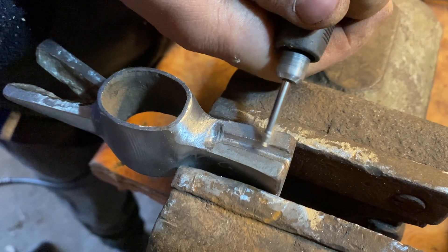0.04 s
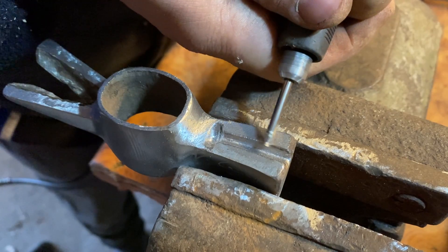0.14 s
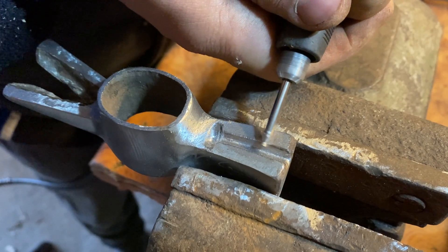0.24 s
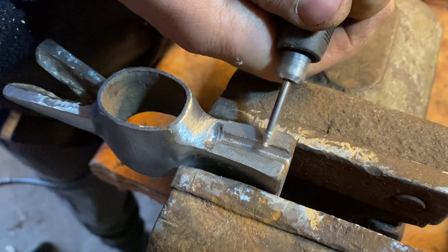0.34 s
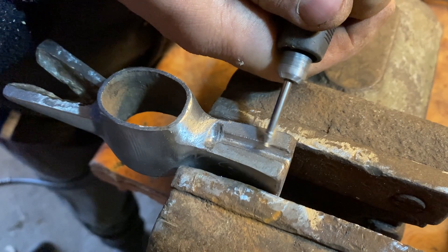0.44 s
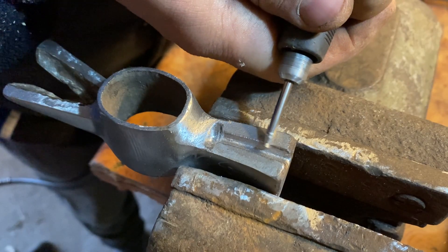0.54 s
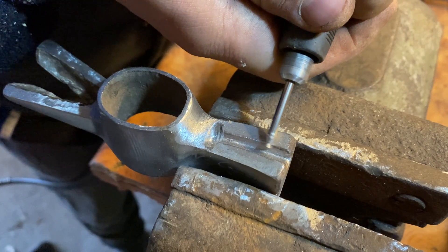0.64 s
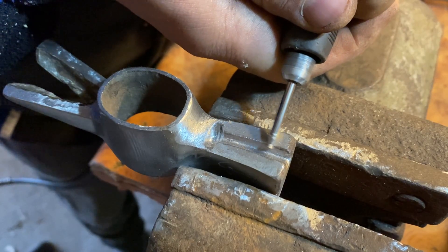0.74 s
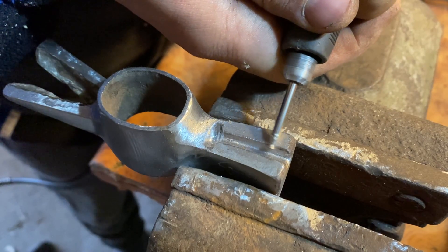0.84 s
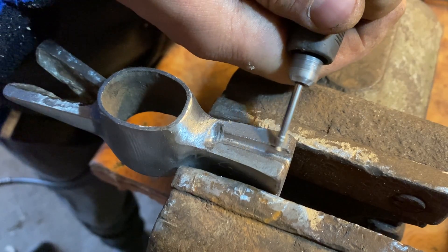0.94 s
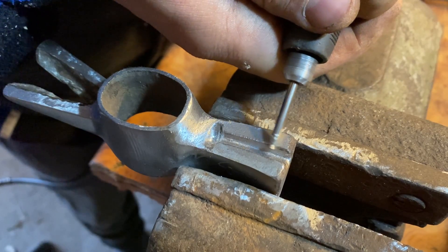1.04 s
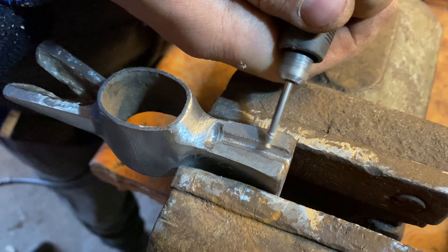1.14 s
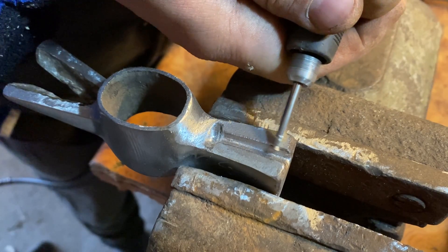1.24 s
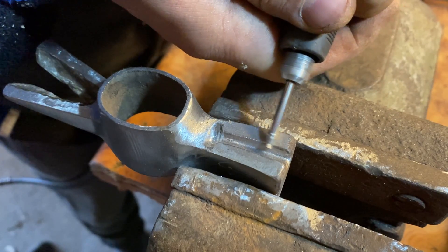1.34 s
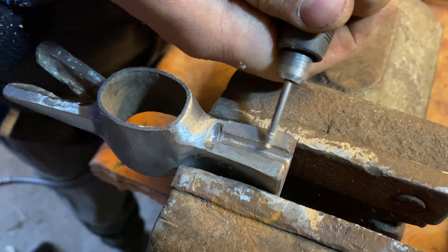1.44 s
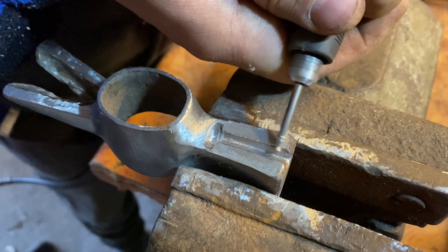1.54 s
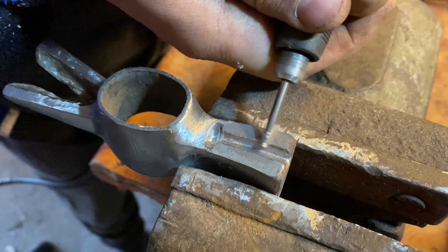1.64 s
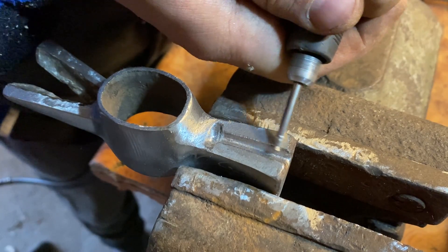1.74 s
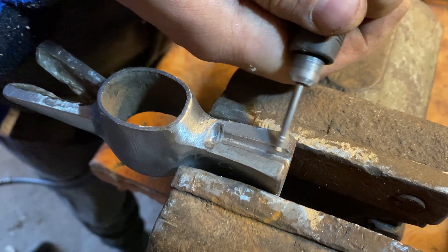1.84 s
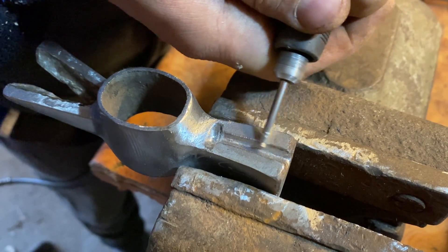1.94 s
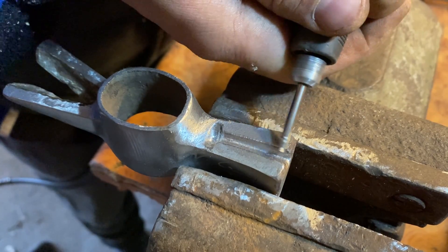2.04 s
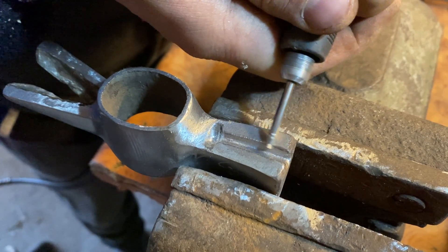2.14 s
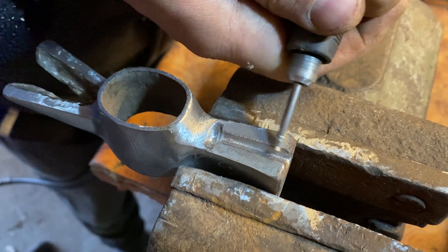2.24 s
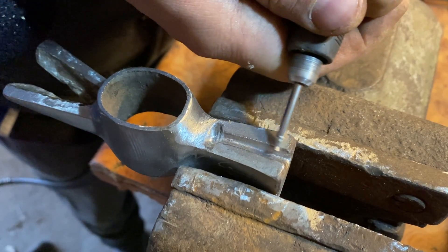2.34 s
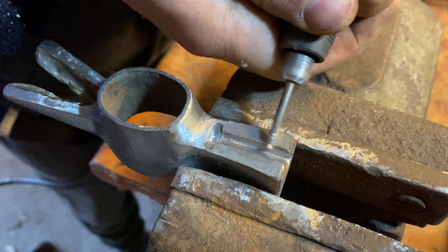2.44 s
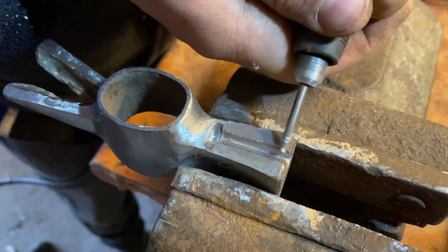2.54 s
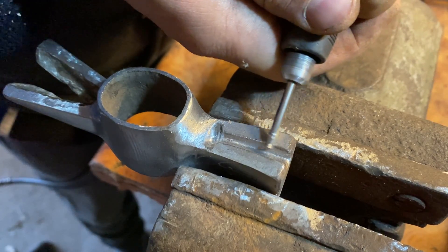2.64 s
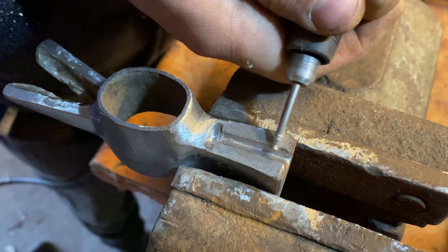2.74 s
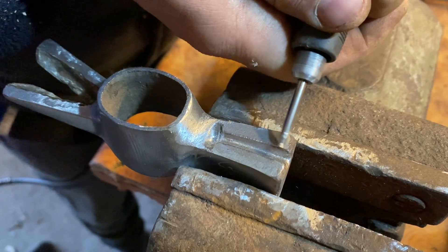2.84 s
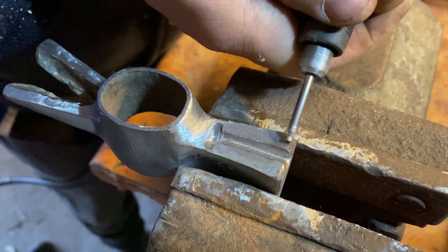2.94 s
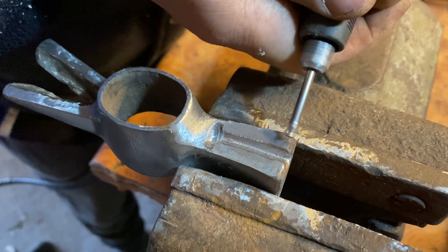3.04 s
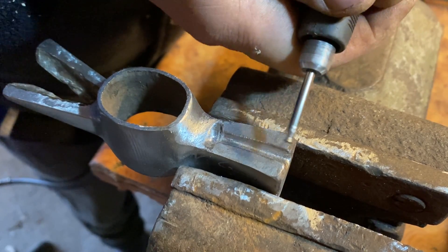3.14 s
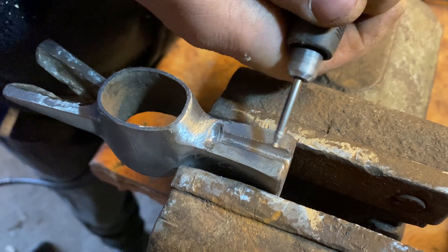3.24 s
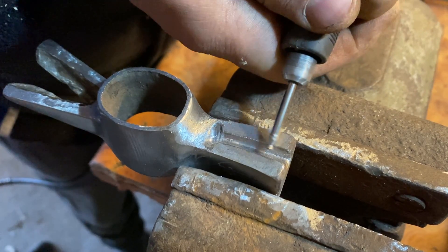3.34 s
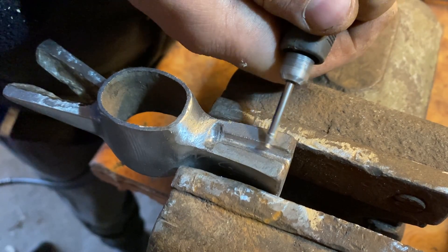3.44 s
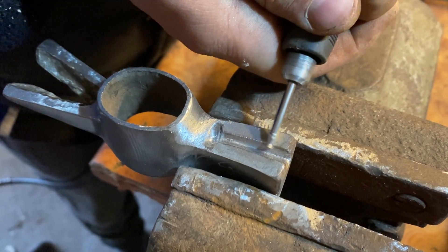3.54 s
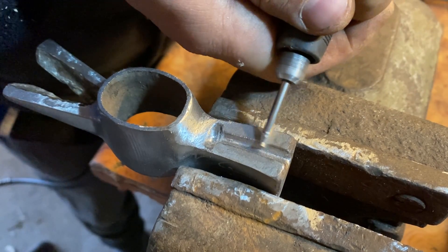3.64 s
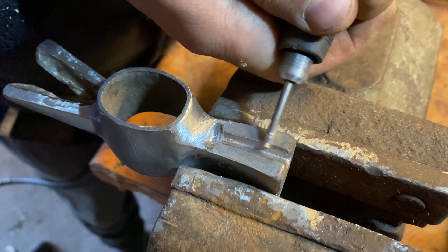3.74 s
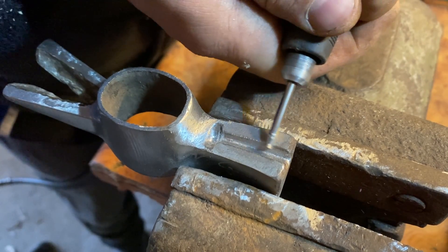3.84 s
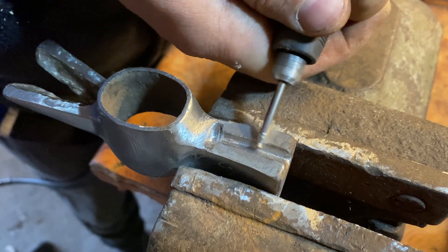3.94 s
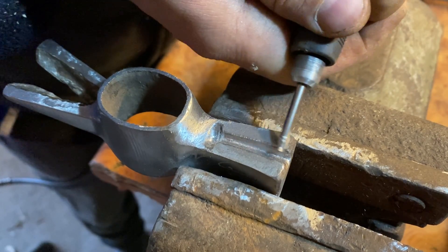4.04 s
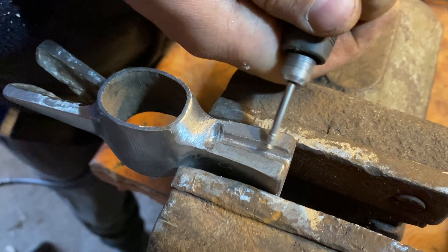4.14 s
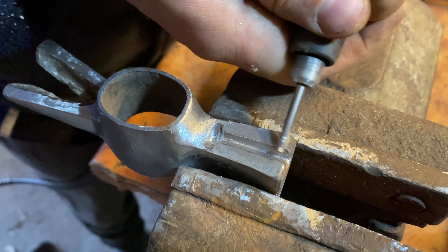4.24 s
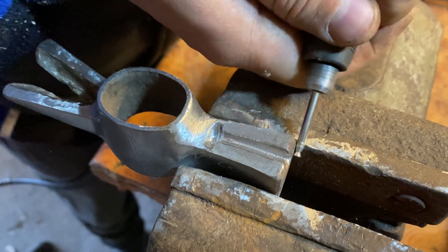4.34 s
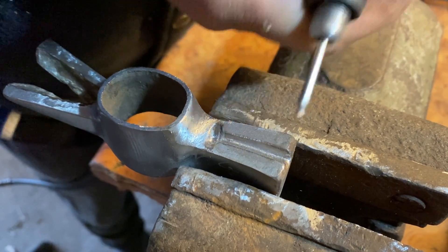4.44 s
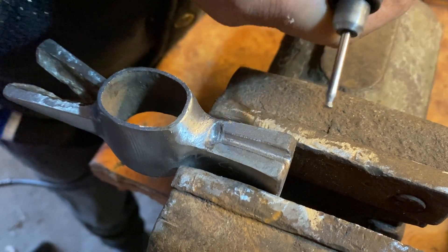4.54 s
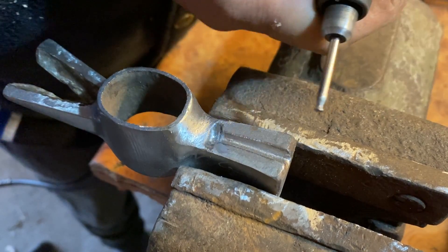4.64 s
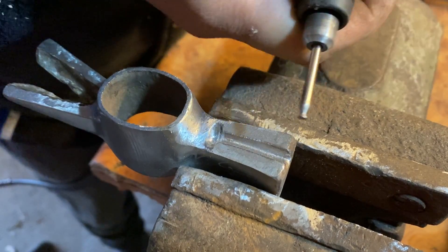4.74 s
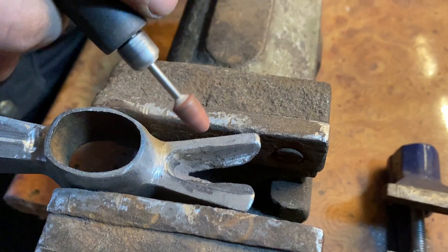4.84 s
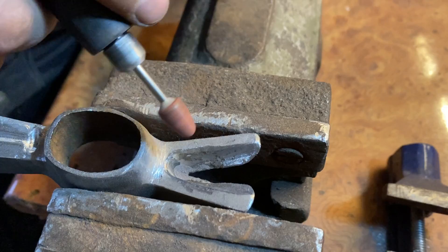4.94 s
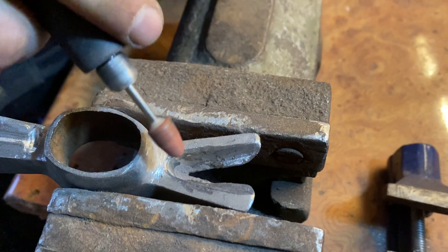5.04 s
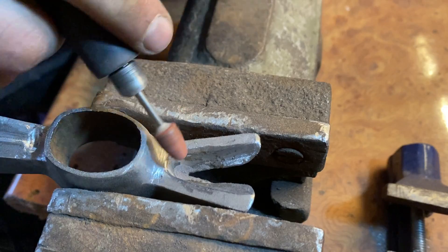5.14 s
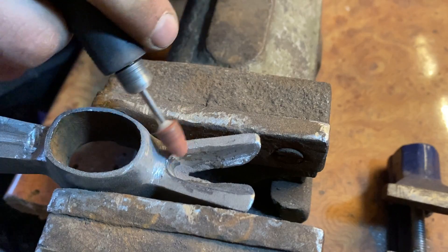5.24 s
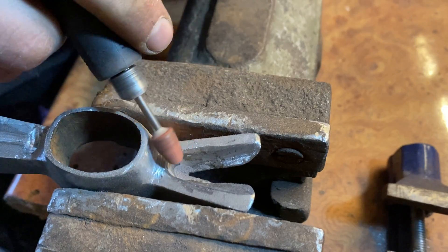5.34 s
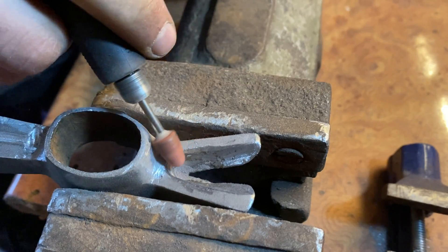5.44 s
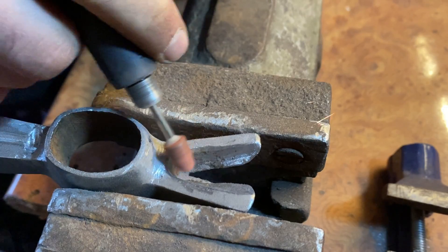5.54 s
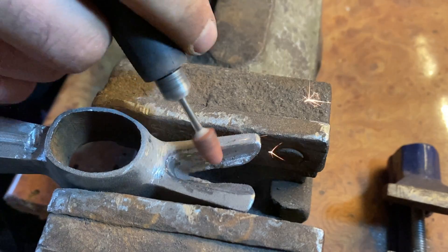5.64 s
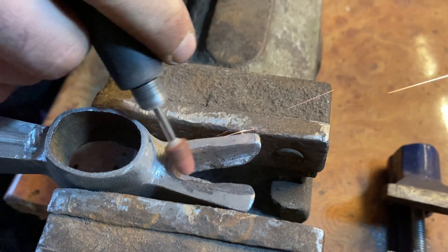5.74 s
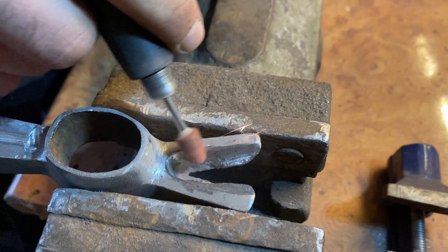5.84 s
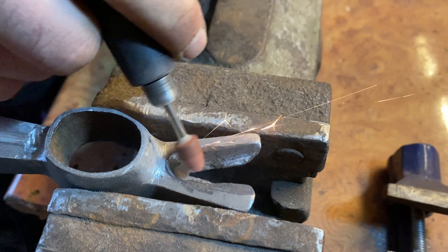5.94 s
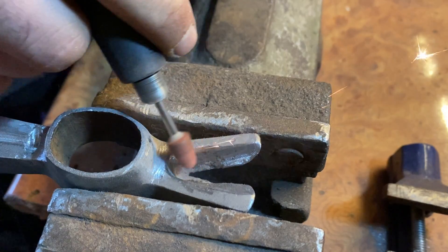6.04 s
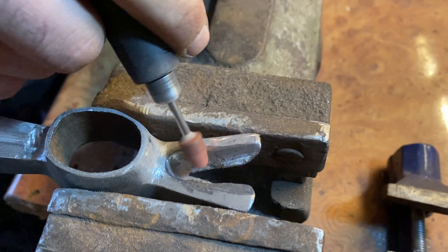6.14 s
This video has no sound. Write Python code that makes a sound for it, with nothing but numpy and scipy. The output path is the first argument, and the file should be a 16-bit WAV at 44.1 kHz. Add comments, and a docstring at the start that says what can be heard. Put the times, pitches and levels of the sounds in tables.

```python
"""Rotary tool on a steel hammer head

A small burr strikes the clamped head once a turn, exciting its resonances and throwing off hissing chips.
The motor sags under load, the burr bounces in the hand, and the whine rises when the tool is lifted.
Then, abruptly, the tool runs faster with a grinding stone, which skitters onto the claw and sets it
ringing. Two closely placed microphone ports hear it over a faint workshop rumble."""
import sys
import numpy as np
from scipy import signal
from scipy.fft import rfft, irfft, next_fast_len
from scipy.io import wavfile

SR = 44100
rng = np.random.default_rng(int(sys.argv[2]) if len(sys.argv) > 2 else 0)


def dump(signal):
    """Clip the signal to [-1, 1] and save it as 16-bit WAV at the path in sys.argv[1]."""
    limited = np.clip(np.atleast_2d(signal).T, -1, 1)
    pcm = np.round(limited * 32767).astype(np.int16)
    wavfile.write(sys.argv[1], SR, pcm)


N = 272963
TIME = np.arange(N) / SR
CHANGE_S = 4.91  # the stone takes over from the burr

# burr on the steel: start t/s, end t/s, least unsteadiness (0-1)
CONTACTS = [(0.09, 3.132, 0.11), (3.514, 4.552, 0.56)]
# hand pressure, one curve a contact: t/s, bite level/dB, chip level/dB, hum level/dB (all relative)
PRESSURE = [
    [(0.1, -62, -41, -71), (0.19, -43.5, -36.5, -82), (0.38, -32, -25.5, -69), (0.7, -36, -24, -59),
     (1.31, -35.5, -27, -60.5), (1.45, -31.5, -28, -64), (1.85, -32.5, -29, -60.5), (2.15, -24.5, -29, -52),
     (2.75, -28.5, -31, -55.5), (3.09, -25.5, -29, -60), (3.11, -24, -30.5, -61)],
    [(3.525, -24, -29, -65), (3.621, -24.5, -27.5, -59.5), (3.909, -28.5, -32, -61),
     (4.125, -25, -27.5, -70), (4.159, -27, -29, -64), (4.345, -26.5, -32, -66), (4.457, -24.5, -29.5, -62),
     (4.481, -25.5, -25.5, -66), (4.54, -29.5, -31, -61)],
]
# the burr catches on an edge: t/s, extra force/dB
EDGE_CATCHES = [(0.404, 5), (3.081, 6), (3.122, -1), (3.517, 3.5), (4.457, 6), (4.547, 8.5)]
# spectra of the cut and of its chips: f/Hz, relative level/dB
BITE_SPECTRUM = [(200, -50), (520, -50), (820, -31), (1200, -19), (1700, -10), (2150, -11.5), (2700, -4),
                 (3450, 0.5), (4400, 0), (5100, -0.5), (6000, -5), (7700, -3)]
CHIP_SPECTRUM = [(5000, -32), (6400, -9), (7800, -12), (8400, -4), (9100, -6), (9500, 4), (10150, -4.5),
                 (10950, 1.5), (11500, -4.5), (12200, -4), (12800, -12.5), (14000, -14.5), (15600, -19)]
def burr(turns, speed, bounce_hz=43.06, bounce_rad=0.52):
    """Periodic impact: each turn gives a strike, then grit; bouncing modulates their phase and force."""
    seated, unsteady = ride(speed)
    bounce_phase = 2 * np.pi * np.cumsum(bounce_hz + 0.9 * wander(4.22)) / SR
    bounce = bounce_rad * unsteady * np.sin(bounce_phase)
    angle = 2 * np.pi * turns + bounce + 0.054 * wander(100)
    caught_db = sum(db * swell(s, 0.0013) for s, db in EDGE_CATCHES)
    force = amp(0.6 * wander(170) + 0.88 * wander(24) + 2 * bounce + caught_db)
    force *= 1 + 0.4 * (1 - seated) * np.cos(angle / 2)  # grazing weakens every other strike
    bunching = blend(1.4, blend(0.9, 0.62, unsteady), seated)  # of the grit around the strike
    spray = np.exp(bunching * np.cos(angle - .5)) / np.sqrt(np.i0(2 * bunching))
    strike = unit(sum(np.cos(k * angle) for k in range(5, 27)))
    clean_share = blend(0.58, 0.21, unsteady)
    drive = force * blend(spray * grit(14000, 2.3), strike, clean_share)
    bite = colour(drive, BITE_SPECTRUM)
    cutting = amp(-1.8) * bite + amp(-4.5) * head_ringing(drive) + knock(angle, force, seated, unsteady)
    squealing = squeals(drive + 1.2 * force * strike)
    chips = amp(3.5) * colour(force * spray ** 0.22 * grit(16000, 2.5), CHIP_SPECTRUM)
    hum = unit(np.cos(angle) * amp(3.1 * wander(190)))
    out = np.zeros(N)
    for (start, end, _), pressure in zip(CONTACTS, PRESSURE):
        bite_db, chips_db, hum_db = curves(pressure)
        sound = amp(bite_db) * cutting + amp(chips_db) * chips + amp(hum_db) * hum
        out += during(start, end) * (sound + squealing)
    return out


def ride(speed, seat_s=0.36, bounce_below_hz=336.3):
    """Contact instability: the burr grazes, seats, then bounces at low speed. Both results run 0-1."""
    seated = .5 + .5 * np.tanh((TIME - seat_s) / 0.13)
    bogged = .5 + .5 * np.tanh((bounce_below_hz - speed) / 0.86)
    least = sum(share * during(start, end) for start, end, share in CONTACTS)
    unsteady = np.clip(1 - seated * (1 - bogged) * (1 - least), 0, 1)
    return seated, unsteady


# modes of the head: f/Hz, bandwidth/Hz, relative level/dB
HEAD_MODES = [(1420, 53, -10), (1770, 43, -16), (2360, 57, -23), (3160, 98, 0), (3478, 144, 3),
              (3890, 200, -0.5), (5086, 520, 1), (6370, 230, -1.5), (7560, 560, 2)]
def head_ringing(drive):
    """Resonance: as the speed sags, one harmonic after another slides through the modes of the steel."""
    return unit(sum(amp(db + 3.5 * wander(4)) * ring(drive, hz, width) for hz, width, db in HEAD_MODES))


# harmonics of the strike: order, relative level/dB riding smoothly, relative level/dB bouncing
KNOCK_HARMONICS = [(2, -15, -16), (3, -5, -3), (4, 6.5, -2.5), (5, 5.5, 5.5), (6, 5, 3.5), (7, -40, 7)]
def knock(angle, force, seated, unsteady):
    """Forced vibration: the strikes shake the head, hardest when the burr is seated and rides smoothly."""
    shaking = sum(amp(blend(smooth_db, bouncing_db, unsteady)) * np.cos(round(k) * angle)
                  for k, smooth_db, bouncing_db in KNOCK_HARMONICS)
    return unit(force * shaking) * amp(-15 + 8.5 * (1 - unsteady) - 30 * (1 - seated))


# squeals: centre t/s, half-length/s, f/Hz, bandwidth/Hz, level/dB
SQUEALS = [(0.533, 0.072, 6300, 500, -31), (0.572, 0.08, 3920, 110, -40.5),
           (0.766, 0.055, 3180, 110, -42.5), (0.944, 0.74, 4920, 209, -45), (1.14, 0.076, 3380, 100, -45.5),
           (2.206, 0.26, 3140, 128, -33), (2.35, 0.39, 1693, 89, -46.5), (3.054, 0.067, 1360, 160, -41.5),
           (3.595, 0.062, 1360, 400, -38), (3.995, 0.33, 3450, 800, -33.5), (4.46, 0.012, 1720, 1200, -28)]
def squeals(drive):
    """Selective resonance: the burr locks briefly onto one mode after another."""
    return sum(amp(db) * swell(s, half_s) * unit(ring(drive, hz, width))
               for s, half_s, hz, width, db in SQUEALS)


# pressure of the stone on the claw: t/s, relative level/dB
GRIND_PRESSURE = [(5.61, -27), (5.624, -36), (5.756, -30), (5.766, -39), (5.818, -27), (6.03, -25.5),
                  (6.19, -26)]
# scratch of the grains: f/Hz, relative level/dB
SCRATCH_SPECTRUM = [(600, -48), (1600, -34), (2200, -20), (3000, -13), (3800, -18), (4700, -30),
                    (5700, -38), (7600, -23), (8500, 8), (9500, 3.5), (10600, 3.5), (12000, -8),
                    (13300, -13), (15600, -12)]
# modes of the claw: f/Hz, bandwidth/Hz, relative level/dB
CLAW_MODES = [(1244, 36, -18.5), (4150, 145, -7), (4960, 160, -17), (6320, 45, -1), (8200, 210, 7),
              (8350, 150, 0.5), (11230, 580, 5), (14000, 300, -3)]
def stone(turns, skip_start_s=5.424):
    """Abrasion: grains scratch the claw and excite its modes, first in skips, then in a steady grind."""
    grind_start_s = GRIND_PRESSURE[0][0]
    flutter = amp(2.2 * np.cos(2 * np.pi * turns) + 2.26 * wander(230) - 0.5)
    grind = during(grind_start_s, np.inf) * flutter * amp(curves(GRIND_PRESSURE)[0])
    skips = amp(-10) * skipping(skip_start_s, grind_start_s)
    push = np.hypot(grind, skips)
    scratch = colour(grit(15000, 2.3), SCRATCH_SPECTRUM)
    rasp = unit(signal.sosfilt(signal.butter(4, 5000, fs=SR, output="sos"), scratch))
    # pressure also damps the claw, so its ringing grows less than the scratch
    drive = np.sqrt(push) * rng.standard_normal(N)
    ringing = sum(amp(db) * ring(drive * amp(2 * wander(4.7)), hz, width) for hz, width, db in CLAW_MODES)
    ringing = unit(ringing) * np.sqrt(np.mean(TIME > skip_start_s))  # rms 1 while the stone touches
    return amp(1) * push * scratch + amp(-27) * ringing + amp(-19) * (grind + skips) * rasp


# first touch and single ticks of the stone on the claw, some faint, some hard: t/s, relative level/dB
STONE_TICKS = [(5.4175, -12), (5.4574, -21), (5.5183, -20), (5.5541, -7), (5.575, -4.5)]
def skipping(start_s, end_s, skips_per_s=150, half_s=0.00089):
    """Intermittent contact: brief force pulses, uneven in spacing and size, add in power."""
    gap, size = rng.standard_normal((48, 2)).T
    gaps = np.exp(0.24 * gap) / skips_per_s
    times = start_s + np.cumsum(gaps) - gaps[0]
    touches = [(s, db) for s, db in zip(times, -14.5 + 1.5 * size) if s < end_s]
    return np.sqrt(sum((amp(db) * swell(s, half_s)) ** 2 for s, db in touches + list(STONE_TICKS)))


# rotation rate with each bit: t/s, f/Hz
BURR_SPEED = [(0, 356), (0.28, 361.5), (0.6, 354.5), (0.9, 343.5), (1.3, 335.5), (1.8, 327.7), (2.4, 325.3),
              (3.0, 323), (3.12, 325.5), (3.3, 339), (3.53, 350), (3.8, 341.3), (4.12, 327), (4.52, 326),
              (4.7, 340), (4.9, 350)]
STONE_SPEED = [(4.91, 420.0), (5.4, 426.75), (5.85, 415), (6.19, 397.5)]
def shaft_speed():
    """Rotation rate sets the fundamental; the curves sag where the bit is under load."""
    return np.where(TIME < CHANGE_S, curves(BURR_SPEED)[0], curves(STONE_SPEED)[0])


# the motor with the burr, as the hand turns it about: t/s, air level/dB, whine level/dB
MOTOR_LEVELS = [(0, -38, -44), (0.9, -34, -60), (2.0, -32, -40), (3.4, -33, -37), (4.2, -30.5, -37),
                (4.6, -35, -41.5)]
# bearings and cooling air with each bit: f/Hz, relative level/dB
BURR_AIR = [(150, -20), (450, -24.5), (1000, -14), (1400, -7.5), (2300, -6), (3200, 1), (4300, -1),
            (5200, 1.8), (6300, 2.5), (9000, 2.5), (10800, 0.5), (11900, 8), (14000, -11), (15600, -4.5)]
STONE_AIR = [(150, -32), (600, -35), (1100, -27.5), (1800, -17.5), (2150, -14.5), (3100, -15), (5600, -11),
             (7000, -9.5), (7800, -4), (8200, -2), (10800, -3.5), (12200, -5), (14000, -12), (15600, -16)]
# shaft unbalance: order, level/dB with the burr, level/dB with the stone
SHAFT_HARMONICS = [(1, -87, -74), (2, -70, -73), (3, -68.5, -73), (4, -70.5, -72), (5, -80, -65.5),
                   (7, -70, -66)]
def motor(turns, with_stone, ripple_hz=100, housing_hz=2765):
    """Rotor noise: bearing hiss, unbalance tones and an eighth-order whine modulated by chopped mains."""
    angle = 2 * np.pi * turns
    air_db, whine_db = curves(MOTOR_LEVELS)
    rattle = grit(12000, 2.15) * amp(0.39 * np.cos(angle) + wander(29))
    air = blend(amp(air_db) * colour(rattle, BURR_AIR), amp(-36) * colour(rattle, STONE_AIR), with_stone)
    shaft = sum(amp(blend(burr_db, stone_db, with_stone))
                * unit(np.cos(round(k) * angle + 0.22 * wander(25)))
                for k, burr_db, stone_db in SHAFT_HARMONICS)
    current = np.exp(2.3 * np.cos(2 * np.pi * ripple_hz * TIME))
    slots = np.cos(8 * angle) + 0.5 * rng.standard_normal(N)
    whine = unit(ring(current * slots, housing_hz, width_hz=210))
    return air + shaft + amp(whine_db) * (1 - with_stone) * whine


# course of the rumble: t/s, level/dB
RUMBLE_LEVEL = [(0, -68), (0.5, -64.5), (2.2, -64), (3.9, -65), (4.6, -75.5), (6.19, -70)]
# its spectrum: f/Hz, relative level/dB
RUMBLE_SPECTRUM = [(25, -11), (50, -2), (100, 0), (200, -4), (400, -5.5), (1500, -15.5), (8000, -27)]
def workshop(hum_hz=60, hum_db=-74.5):
    """Background noise: a low pure tone and a faint rumble that grows while the burr works."""
    rumble = amp(curves(RUMBLE_LEVEL)[0]) * colour(rng.standard_normal(N), RUMBLE_SPECTRUM)
    return rumble + amp(hum_db) * unit(np.sin(2 * np.pi * hum_hz * TIME))


# the two ports, facing each bit: f/Hz, left phase lead/rad, left minus right level/dB
BURR_PORTS = [(480, 0, -3), (1040, 0.5, 0), (1600, 0.9, 2), (2210, 1.5, 2), (3380, 0.9, 4),
              (5560, 1.12, 4.5), (6510, 0.84, 1.1), (8900, -3, 0), (15000, -12, 0), (16200, -7, 0)]
STONE_PORTS = [(1180, 0, 0), (1620, 4, 0.13), (2250, 4.5, 1), (3720, 6, 1), (5140, 8.5, 1), (5850, 8.5, 1),
               (6500, 7, 0.67), (9080, 3, 0), (14950, -5.5, 0), (16200, -4, 0)]
# likeness of the two ports: f/Hz, direct share of the power (0-1)
COHERENCE = [(100, .995), (900, .97), (2000, .8), (5800, .76), (7000, .95), (9000, .98), (12500, .94),
             (13300, .98), (15500, .92)]
# bass arriving in antiphase: f/Hz, side minus mid level/dB
BASS_WIDTH = [(60, 2), (160, 9), (240, 0), (340, 9), (480, 5), (650, -1), (950, -6), (1400, -47)]
def microphones(x, ports, room_t60_s=.24, bass_flip_hz=480):
    """Superposition: each port sums direct sound, its own scatter from bench and room, and opposed bass."""
    size = next_fast_len(N + SR // 2)
    hz = np.fft.rfftfreq(size, 1 / SR)
    lead, balance_db = curves(ports, hz)
    alike = curves(COHERENCE, hz)[0]
    t = TIME[:SR // 4]
    taps = rng.standard_normal((2, len(t))) * amp(-60 * t / room_t60_s) * (t > .001)
    scatter = rfft(taps / np.linalg.norm(taps, axis=1, keepdims=True), size)
    side = np.array([[.5], [-.5]])
    direct = np.sqrt(alike) * np.exp(1j * side * lead)
    paths = (direct + np.sqrt(1 - alike) * scatter) * amp(side * balance_db)
    opposed = 2j * side * np.tanh((hz - bass_flip_hz) / 20) * amp(curves(BASS_WIDTH, hz)[0])
    return irfft(rfft(x, size) * (paths + opposed), size)[:, :N]


def amp(db):
    """Amplitude ratio of a level in decibels."""
    return 10 ** (np.asarray(db) / 20)


def unit(x):
    """Normalisation to rms 1."""
    return x / np.sqrt(np.mean(x ** 2) + 1e-20)


def blend(a, b, share):
    """Linear crossfade from a to b."""
    return a + (b - a) * share


def curves(rows, at=TIME):
    """Linear interpolation of each later column against the first."""
    points, *columns = np.transpose(rows)
    return [np.interp(at, points, c) for c in columns]


def during(start, end, fade_s=0.0035):
    """Trapezoidal gate: 1 between two times."""
    return np.clip((TIME - start) / fade_s + .5, 0, 1) * np.clip((end - TIME) / fade_s + .5, 0, 1)


def swell(s, half_s):
    """Gaussian pulse around one moment."""
    return np.exp(-np.minimum(((TIME - s) / half_s) ** 2, 20))


def wander(rate_hz):
    """Random modulation: low-pass noise of rms 1."""
    coarse = TIME[::32]
    hz = np.fft.rfftfreq(len(coarse), coarse[1])
    slow = irfft(rfft(rng.standard_normal(len(coarse))) / (1 + (hz / rate_hz) ** 4), len(coarse))
    return unit(np.interp(TIME, coarse, slow))


def grit(per_s, spread_db):
    """Shot noise: tiny fractures at random moments, a few much larger than the rest."""
    size = amp(spread_db * np.minimum(rng.exponential(1, N), 4))
    return unit(size * rng.choice([-1., 1.], N) * (rng.random(N) < per_s / SR))


def ring(x, hz, width_hz):
    """Second-order resonance of peak gain 1."""
    return signal.lfilter(*signal.iirpeak(hz, hz / width_hz, fs=SR), x)


def colour(x, spectrum):
    """Minimum-phase filtering to the given spectrum; the result has rms 1."""
    hz, db = np.transpose(spectrum)
    grid = np.fft.rfftfreq(4096, 1 / SR) + 1
    octaves_beyond = np.maximum(np.log2(hz[0] / grid), 0) + np.maximum(np.log2(grid / hz[-1]), 0)
    gain = amp(np.maximum(np.interp(np.log(grid), np.log(hz), db) - 36 * octaves_beyond, -90))
    log_gain = np.log(np.r_[gain, gain[-2:0:-1]])
    taps = np.fft.ifft(np.exp(np.conj(signal.hilbert(log_gain)))).real
    return unit(signal.oaconvolve(x, taps)[:N])


def scene():
    """Common excitation: one shaft angle drives the motor and whichever bit it carries."""
    with_stone = during(CHANGE_S, np.inf)
    speed = shaft_speed()
    turns = np.cumsum(speed) / SR
    sound = burr(turns, speed) + motor(turns, with_stone) + stone(turns) + workshop()
    return blend(microphones(sound, BURR_PORTS), microphones(sound, STONE_PORTS), with_stone)


def record(dry, mono_hz=1230, slide_start_s=1.31, octaves_per_s=1.1, band_limit_hz=15900):
    """Mid-side filtering: the sound folds to mono below a sliding edge, then is band-limited."""
    mid, side = (dry[0] + dry[1]) / 2, (dry[0] - dry[1]) / 2
    hz, t, spectra = signal.stft(side, SR, nperseg=1024, noverlap=768)
    # the edge slides down while the burr works and returns with the stone
    edge_hz = mono_hz / 2 ** (octaves_per_s * np.maximum(t - slide_start_s, 0) * (t < CHANGE_S))
    highpass = 1 - 1 / (1 + (hz[:, None] / edge_hz) ** 20)
    side = signal.istft(spectra * highpass, SR, nperseg=1024, noverlap=768)[1][:N]
    lowpass = signal.firwin(511, band_limit_hz, window=("kaiser", 9), fs=SR)
    return signal.oaconvolve(np.array([mid + side, mid - side]), lowpass[None], "same")


dry = scene()
out = record(dry)
dump(out)
```